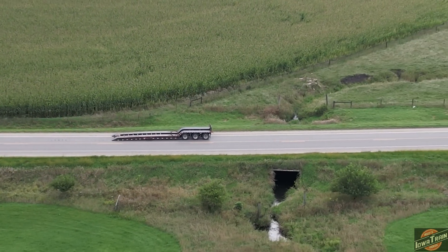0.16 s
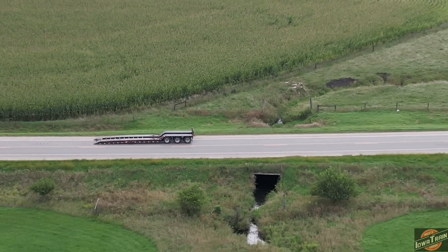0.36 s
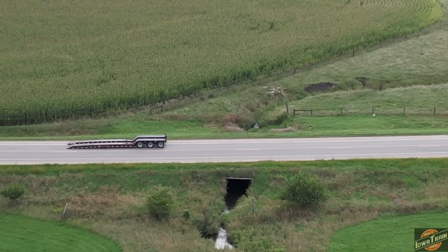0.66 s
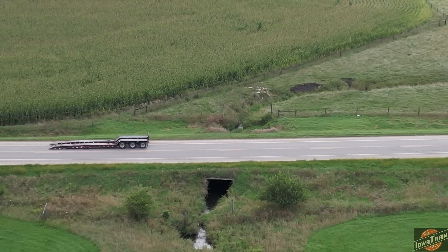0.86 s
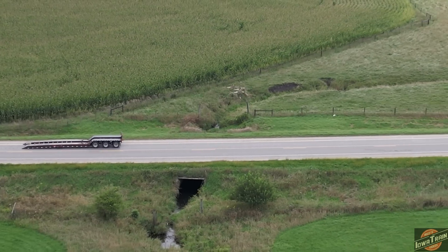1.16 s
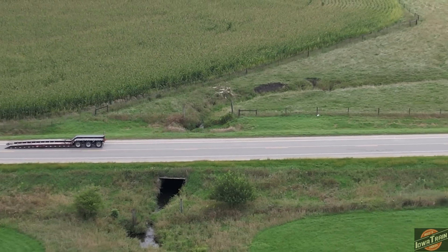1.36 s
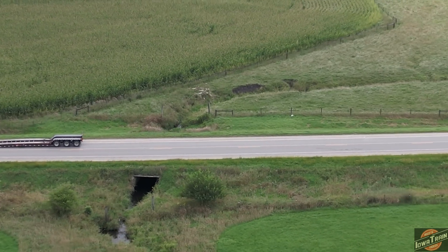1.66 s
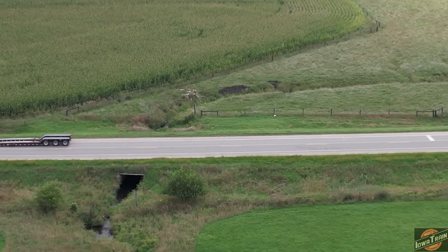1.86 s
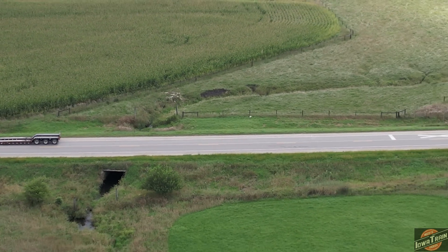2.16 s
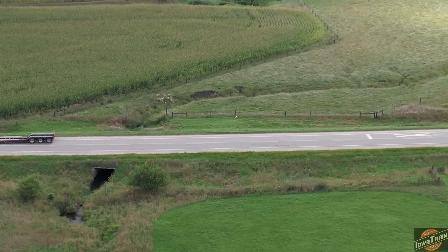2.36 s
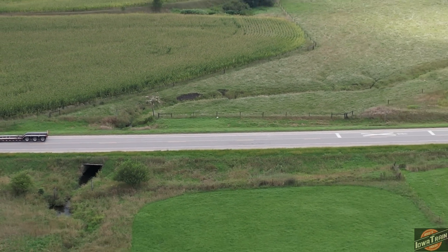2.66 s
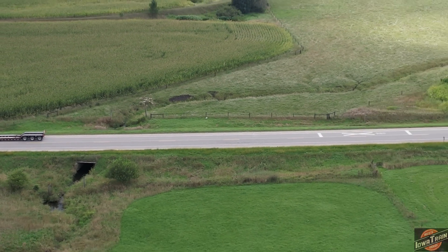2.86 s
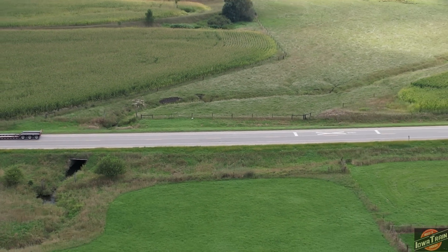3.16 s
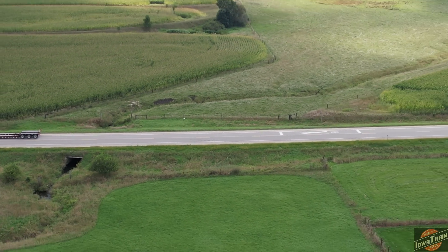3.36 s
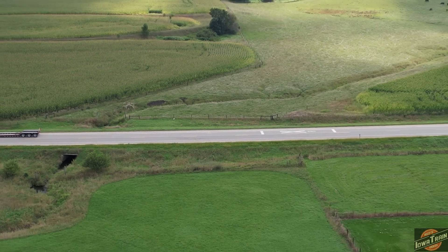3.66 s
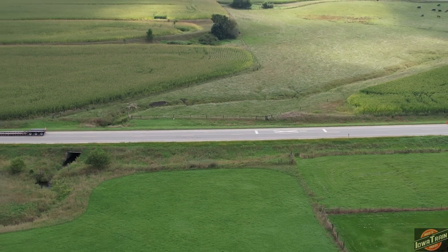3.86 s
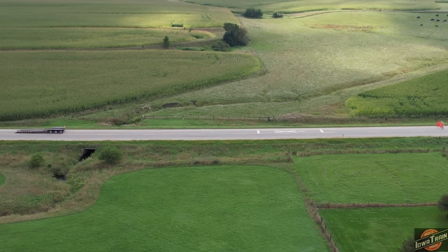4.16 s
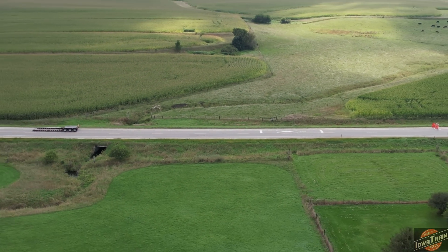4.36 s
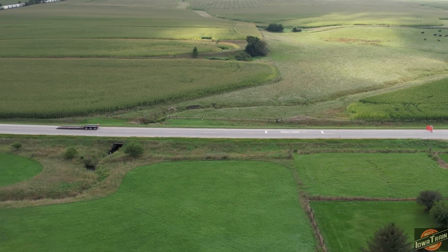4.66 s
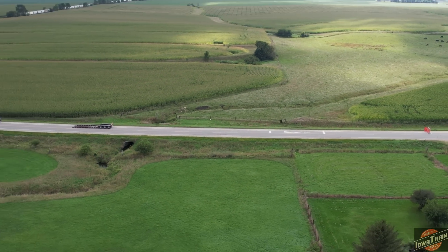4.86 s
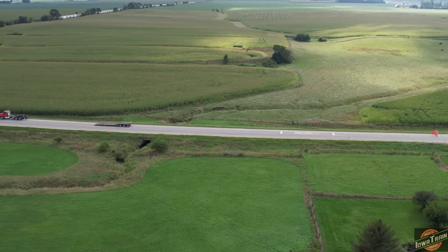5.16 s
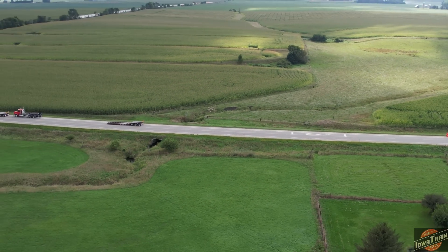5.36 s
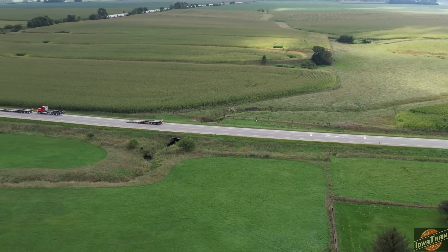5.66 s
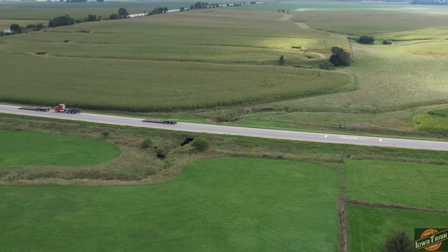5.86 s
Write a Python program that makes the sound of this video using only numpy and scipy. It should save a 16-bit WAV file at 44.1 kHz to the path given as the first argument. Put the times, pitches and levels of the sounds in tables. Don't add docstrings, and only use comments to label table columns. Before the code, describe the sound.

A summer field full of trilling crickets, with gusts of wind buffeting the microphone and a truck's distant roar receding to the left.

```python
import sys
import numpy as np
from scipy import signal
from scipy.io import wavfile
from scipy.ndimage import uniform_filter1d

SR = 44100
rng = np.random.default_rng(int(sys.argv[2]) if len(sys.argv) > 2 else 0)


def volts(x):
    e = np.asarray(x, float) / 20
    return 10 ** e


def transcribe(signal):
    frames = np.atleast_2d(signal).T
    limited = np.clip(frames, -1, 1)
    pcm = np.round(limited * 32767).astype(np.int16)
    wavfile.write(sys.argv[1], SR, pcm)


N = 265923

# [t/s, shift of the field to the left channel/dB]
TURN = [
    (0, 1),
    (3.2, 0.3),
    (4.3, -1.5),
    (5.25, -6),
    (5.55, -2),
    (6.03, -3.5),
]


def near_crickets():
    # [t/s, level/dB, time between strokes/s]
    quick_chirps = [(.1789, -45, 0.041), (.5298, -46.5, .0406), (.8213, -45, .04), (1.1753, -44.5, .0411),
                    (1.4484, -45.5, .039), (1.7244, -45.5, .04), (1.9958, -46, 0.039), (2.2605, -47.5, .04),
                    (2.5459, -47.5, .0387), (2.8037, -49, 0.037), (3.0684, -49.5, .0397),
                    (3.345, -47, 0.035), (3.6079, -46.5, 0.039), (3.8684, -51.5, .0416),
                    (4.1439, -47, .0425), (4.4117, -45, 0.037), (4.7, -54.5, 0.045), (4.9759, -53, 0.043),
                    (5.2694, -52, 0.037), (5.5585, -48, 0.039), (5.8445, -50, 0.036)]
    # [t/s, level/dB, time between strokes/s]
    slow_chirps = [(.2589, -43, 0.039), (.8939, -44, 0.04), (1.195, -45.5, .039), (1.5264, -41.5, 0.039),
                   (1.898, -44.5, 0.039), (2.4264, -46, 0.039), (2.7073, -46, 0.04), (3.0684, -45.5, 0.042),
                   (3.425, -46, .0402), (3.7909, -46.5, 0.04), (4.1046, -48, .0416), (4.4681, -48.5, 0.041),
                   (4.7686, -48.5, 0.037), (5.1587, -47.5, 0.042), (5.4902, -50.5, 0.045),
                   (5.8737, -48.5, 0.04)]
    # [t/s, level/dB, f/Hz,
    # length/s]
    stray_strokes = [(0.0156, -47, 5200, .01), (.3284, -50.5, 5460, .05), (0.6186, -47.5, 5200, .01),
                     (0.658, -45, 5200, .01), (1.042, -52, 5320, .05), (1.486, -50, 5360, .01),
                     (1.6375, -54, 5120, .01), (1.798, -55, 5280, .01), (2.12, -55, 5140, .05),
                     (2.167, -56.5, 5470, .05), (2.236, -64, 5200, .01), (2.681, -55, 5200, .01),
                     (3.362, -56.5, 4940, .09), (4.239, -53, 5160, .05), (4.341, -53, 5120, .05),
                     (4.7222, -53, 5200, .01), (5.3912, -53, 5200, .01), (5.796, -58, 5280, .01),
                     (5.905, -53, 5280, .01)]
    # [t/s, level/dB, f/Hz, left-right/dB]
    low_strokes = [
        (3.105, -64.5, 4250, -5),
        (3.143, -64.5, 4250, -5),
        (3.208, -65, 4250, -5),
        (3.655, -67, 4250, -5),
        (3.693, -65, 4200, -5),
        (4.03, -68, 4150, -5),
        (4.065, -65, 4300, -5),
        (4.93, -58, 4850, -8),
    ]
    slow_pan_db, stray_gap_s = -4, .0355
    rows = chirp_strokes(quick_chirps, hz=5280, build_db=(-3.5, -1, -1.9), pan_db=-6, swing=1.5)
    rows += chirp_strokes(slow_chirps, hz=5200, build_db=(-2, -0.9, -1.6), pan_db=slow_pan_db, swing=1.1)
    rows += low_strokes
    for s, db, hz, length in stray_strokes:
        pan = slow_pan_db + turn_at(s)
        rows += [(s + late, db, hz, pan) for late in np.arange(3) * stray_gap_s if late < length]

    out = np.zeros((2, N))
    for s, db, hz, pan in rows:
        vary_length, vary_fall, vary_db = rng.standard_normal(3)
        length = .022 * (1 + 0.038 * vary_length)
        u = np.linspace(0, 1, round(length * SR))
        tone = stroke(u, hz, length, fall=0.14 * (1 + 0.19 * vary_fall), bend=3.72, soft=0.89)
        add(out, s, volts(db + 1.0 + 0.73 * vary_db) * sides(pan)[:, None] * tone)
    wobble = evened(uniform_filter1d(rng.standard_normal(N), size=110))
    return out * volts(1.42 * wobble) + volts(-38) * field(out, t60=0.033, start=0.0073)


def chirp_strokes(chirps, hz, build_db, pan_db, swing):
    rows = []
    for s, db, gap in chirps:
        pan = pan_db + swing * turn_at(s)
        rows += [(s + k * gap, db + more_db, hz, pan) for k, more_db in zip((0, 0.99, 2), build_db)]
    return rows


def stroke(u, hz, length, fall, bend, soft):
    cycles = hz * length * (1.0121 * u - fall * u ** (bend + 1) / (bend + 1))
    return np.sin(np.pi * np.clip(u, 0, 1)) ** soft * np.sin(2 * np.pi * cycles)


def field(x, t60, start):
    t = np.arange(round(.12 * SR)) / SR
    tail = rng.standard_normal((2, len(t))) * volts(-60 * t / t60) * (t > start)
    return signal.oaconvolve(x, tail / np.linalg.norm(tail[0]), axes=1)[:, :N]


def far_crickets():
    db = -57.5 + 1.14 * swell(per_s=3)
    pan = -4.5 + 0.39 * over_time(TURN)[0]
    far = crowd(count=12, hz=5125, spread_hz=220, per_s=360, length=.018, fall=0.0844, uneven_db=1.3, same=0.8)
    return volts(db - 4.0) * sides(pan) * far


def choir():
    # [f/Hz, bursts per s, level in the choir/dB, left-right/dB]
    soloists = [
        (8390, 15, -15, -8),
        (8614, 22, -8.5, -0.5),
        (7980, 17, -13.5, -2.5),
    ]
    t = np.arange(N) / SR
    db = -49.5 - 0.015 * t
    pan = -5.5 + 0.27 * over_time(TURN)[0]
    trill = crowd(count=14, hz=8610, spread_hz=306, per_s=1500, length=.012, fall=0.0864, uneven_db=1.5, same=0.44)
    for hz, rate, solo_db, solo_pan in soloists:
        phase = rng.random()
        turns = rate * t + phase + .5 * np.sin(2 * np.pi * (.3 * t + phase))
        bursts = crowd(count=3, hz=hz, spread_hz=202.0, per_s=700, length=0.00854, fall=0.068, uneven_db=3.5,
                       same=0.32, gate=turns % 1 < .4)
        trill = trill + volts(solo_db) * sides(solo_pan)[:, None] * bursts
    return volts(db + 2.2) * sides(pan) * evened(trill)


def crowd(count, hz, spread_hz, per_s, length, fall, uneven_db, same, gate=0.93):
    out, u = np.zeros((3, N)), np.linspace(0, 1, round(length * SR))
    for step in np.linspace(-1, 1, count):
        pitch = hz + spread_hz * (np.arctanh(.95 * step) - 0.26 * step ** 2)
        draw, size = rng.random((2, 3, N))
        loud_db = uneven_db * np.minimum(-np.log(1 - size), 4.5)
        train = (draw < gate * per_s / count / SR) * volts(loud_db)
        wing = stroke(u, pitch, length, fall, bend=2.063, soft=0.32)
        out += signal.oaconvolve(train, wing[None], axes=1)[:, :N]
    same = np.clip(same, 0, 1)
    return evened(np.sqrt(same) * out[0] + np.sqrt(1 - same) * out[1:])


def wind():
    # [t/s, rumble level/dB, flutter above it/dB, left-right of the flutter/dB]
    gusts = [(0, -52, 1.5, 1.5), (.45, -52, 1.3, 4.5), (1.25, -51.5, -1, -10), (1.62, -55.5, -3.5, -4),
             (2.29, -47, -4, 3.5), (2.36, -44, -2, 2), (2.95, -43.5, 3, -4), (3.1, -39.5, -4.5, -5.5),
             (3.35, -47.5, -1.5, -6), (3.9, -44.5, 0.5, -4), (4.4, -43, 0, -1.5), (4.68, -42.5, -9, 0.5),
             (5.05, -45.5, -9.5, 18), (5.18, -50.5, -12, 14), (5.36, -44, -1.5, 5), (5.44, -53, -6.5, 3),
             (5.92, -56.5, -6.5, -1), (6.03, -47, -10, 3)]
    # [t/s, level above the wind/dB, length/s]
    eddies = [(0.108, 7, 0.17), (0.28, 9.5, 0.15), (0.69, 2.5, 0.12), (1.062, -0.5, 0.17),
              (1.698, 4, 0.048), (1.953, 1.5, 0.059), (2.155, 1, 0.07), (2.433, 9, 0.11),
              (2.573, 7.5, 0.046), (2.66, 10, 0.025), (2.773, 11.5, 0.037), (2.955, 8.5, 0.076),
              (3.095, -1, .08), (3.34, 7.5, 0.053), (3.476, 7, 0.034), (3.58, 6.5, 0.1), (3.746, 6.5, .06),
              (3.845, 9.5, 0.053), (4.11, 6.5, 0.094), (4.274, 11.5, 0.035), (4.455, 2, 0.081),
              (4.597, 6, 0.12), (4.756, 2.5, 0.05), (5.056, 3, .06), (5.266, 5, 0.091), (5.632, 6, .15)]
    # [f/Hz, level/dB]
    rumble_bands = [(15, -32), (30, -5), (55, 6), (85, 4), (130, -5.5), (200, -40), (400, -79)]
    # [f/Hz, level/dB, added left-right/dB, left-right likeness 0-1]
    flutter_bands = [(69, -62, -31, 0.5), (117, 0, 3.5, 1), (182.5, -4.5, -5, 0.88), (255.4, -13, -2.5, 1),
                     (298, -15, 3, 0.99), (432, -27.5, -4.5, 0.95), (724, -39.5, 16, 1)]
    db, flutter_db, pan = over_time(gusts)
    t = np.arange(N) / SR
    eddy_db = sum(lift_db * np.exp(-(2 * (t - s) / length) ** 2) for s, lift_db, length in eddies)
    rumble = steadied(noise(rumble_bands, same=1.0, patchy_db=2.5, size=2048), seconds=0.052)
    rumble = rumble * sides(2.4)[:, None]
    flutter = steadied(noise(flutter_bands, patchy_db=3.0, size=1024), seconds=0.062) * sides(pan)
    return volts(db) * (volts(eddy_db) * rumble + volts(flutter_db + 0.55 * eddy_db) * flutter)


def steadied(x, seconds):
    power = uniform_filter1d((x ** 2).mean(0), size=round(seconds * SR))
    return evened(x / (power + 0.023) ** 0.33)


def road():
    # [f/Hz, level/dB]
    tyres_near = [(210, -21), (350, -3.5), (392, -7), (432, -15.5), (460, -9.5), (644, -6.5), (713, -4.5),
                  (790, -1.5), (999, -10), (1180, -21), (1600, -20.5), (2080, -48), (3520, -120)]
    # [f/Hz, level/dB]
    tyres_far = [(210, -15), (350, -6), (432, -1.5), (539, -13), (665, 1), (718, -7.5), (826, -2),
                 (886, -7), (974, -13.5), (1120, -15.5), (1600, -18.5), (2080, -31.5), (3520, -120)]
    # [f/Hz, width/Hz, level in the road/dB]
    whine = [
        (682, 6, -7.5),
        (632, 16, -12),
        (1314, 45, -25),
        (430, 30, -16),
    ]
    t = np.arange(N) / SR
    away = np.clip(t / 5.34, 0, 1)
    roar = np.sqrt(1 - away) * noise(tyres_near, same=0.82, patchy_db=1.45)
    roar = roar + np.sqrt(away) * noise(tyres_far, same=1.0, patchy_db=2.5)
    for hz, width, db in whine:
        r = np.exp(-np.pi * width / SR)
        fuzz = signal.lfilter([1], [1, -r], rng.standard_normal((N, 2)) @ [1, 1j])
        tread = evened((fuzz * np.exp(2j * np.pi * hz * t)).real)
        roar = roar + volts(db - 5.5 * (1 - away)) * tread
    level_db = -55.5 - 0.3941 * t + 0.4 * np.sin(2 * np.pi * (t / 2.87 + 1.03))
    return volts(level_db) * sides(3.9)[:, None] * roar


def engine():
    firing_hz, sag_hz_per_s, lost_s = 145.7, 6.5, 2.1
    t = np.arange(N) / SR
    fade = np.clip((lost_s - t) / 0.35, 0, 1)
    waver = 1 + 0.016 * evened(uniform_filter1d(rng.standard_normal(N), size=3000))
    turns = np.cumsum((firing_hz - sag_hz_per_s * t) * waver) / SR
    tone = volts(-5 * t) * np.sin(2 * np.pi * turns) + volts(-3.5) * np.sin(np.pi * turns)
    return volts(-52 + 1.6 * swell(per_s=4.5)) * fade * tone * sides(1.3)[:, None]


def ticks():
    # [t/s, level/dB, f/Hz, t60/s, left-right/dB]
    blows = [
        (.085, -42, 3900, .003, 4),
        (.165, -50, 3100, .003, 4),
        (.429, -44, 3400, .004, 4),
        (.429, -52, 1850, .025, 4),
        (2.765, -43, 310, .08, 2),
    ]
    out, t = np.zeros((2, N)), np.arange(SR // 5) / SR
    for s, db, hz, t60, pan in blows:
        attack = np.tanh(t / (.05 * t60))
        ring = volts(db - 60 * t / t60) * np.sin(2 * np.pi * hz * t) * attack
        add(out, s, sides(pan)[:, None] * ring)
    return out


def hoot():
    # [t/s, level/dB, f/Hz, length/s, left-right/dB]
    note = (1.125, -52, 655, .11, 4)
    s, db, hz, length, pan = note
    out, t = np.zeros((2, N)), np.arange(round(length * SR)) / SR
    tone = np.sin(np.pi * t / length) * np.sin(2 * np.pi * hz * t)
    add(out, s, volts(db) * sides(pan)[:, None] * tone)
    return out


def bird():
    # [t/s, level/dB, start f/Hz]
    cheeps = [
        (3.135, -71, 3600),
        (3.275, -69, 3550),
        (3.4, -70, 3200),
    ]
    length = .04
    out, u = np.zeros((2, N)), np.linspace(0, 1, round(length * SR))
    for s, db, hz in cheeps:
        cheep = stroke(u, hz, length, fall=.28, bend=1, soft=0.92)
        add(out, s, volts(db) * np.tile(cheep, (2, 1)))
    return out


def breeze():
    # [f/Hz, level/dB]
    air = [(900, -4.5), (1400, -5), (2000, -1), (2800, -6), (3900, -8.5), (6000, -14), (7000, -3),
           (9300, -9), (9800, -38)]
    # [left-right/dB, left-right likeness 0-1]
    air_sides = [(3, .85), (3, .85), (3.5, .88), (4, .88), (2, .8), (1, .5), (0, .4), (0, .5), (0, .5)]
    t = np.arange(N) / SR
    rustle_db = 0.5 * np.exp(-((t - 3.1) / 0.29) ** 2)
    return volts(-71 + 0.51 * t + 3.5 + rustle_db) * noise(np.hstack([air, air_sides]), patchy_db=1.5)


def fine_hiss():
    # [f/Hz, level/dB]
    hiss = [(9000, -27), (9700, 4), (10400, 3), (10900, -14), (11400, 4), (13800, 4), (15500, 6),
            (16600, -19)]
    t = np.arange(N) / SR
    return volts(-72.5 - 0.28 * t + 1.5 + 1.1 * swell(per_s=3)) * noise(hiss, same=0.92, patchy_db=0.5)


def noise(points, same=1., patchy_db=1., size=1024):
    hz = np.fft.rfftfreq(size, 1 / SR)
    f, db, *more = np.transpose(points)
    columns = (db, *(more or (0, same)))
    db, pan, same = (np.interp(np.log(hz + 1), np.log(f), c + 0 * f)[:, None] for c in columns)
    a, b, c, d, patches = rng.standard_normal((4 * N // size + 5, len(hz), 5)).T
    patches = uniform_filter1d(patches, size=6, axis=0)
    patches = evened(uniform_filter1d(patches, size=6, axis=1))
    same = np.clip(same, 0, 1)
    left = a + 1j * b
    right = same * left + np.sqrt(1 - same ** 2) * (c + 1j * d)
    in_band = ((hz > f[0]) & (hz < f[-1]))[:, None]
    z = np.array([left, right]) * sides(pan) * volts(db + patchy_db * patches) * in_band
    return evened(signal.istft(z, nperseg=size, noverlap=3 * size // 4)[1][:, :N])


def swell(per_s):
    t, hz = np.arange(N) / SR, per_s * np.geomspace(.1, 1, num=8)
    return evened(np.sin(2 * np.pi * (hz[:, None] * t + rng.random((len(hz), 1)))).sum(0))


def evened(x):
    return x / np.sqrt(np.mean(x ** 2) + 1e-20)


def sides(pan_db):
    left = volts(pan_db)
    return 2 * np.array([left, np.ones_like(left)]) / (1 + left)


def over_time(rows):
    s, *columns = np.transpose(rows)
    return [np.interp(np.arange(N) / SR, s, c) for c in columns]


def turn_at(s):
    return np.interp(s, *np.transpose(TURN))


def add(mix, s, sound):
    part = mix[:, round(s * SR):][:, :sound.shape[1]]
    part += sound[:, :part.shape[1]]


def scene():
    insects = near_crickets() + far_crickets() + choir()
    traffic = road() + engine()
    small_sounds = ticks() + hoot() + bird()
    return insects + wind() + traffic + small_sounds + breeze() + fine_hiss()


def band_limit(x):
    return signal.sosfilt(signal.butter(12, 15770, fs=SR, output="sos"), x)


def record(dry):
    return band_limit(dry)


dry = scene()
out = record(dry)
transcribe(out)
```